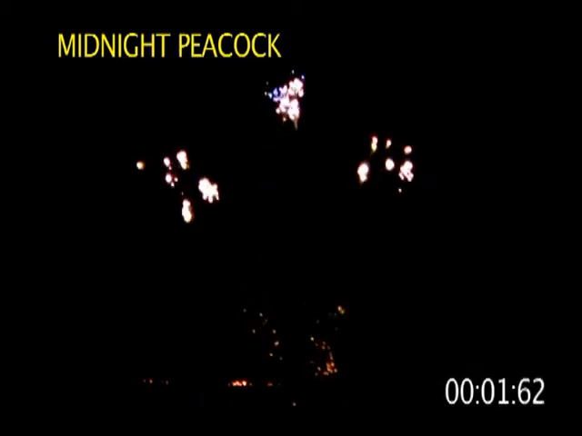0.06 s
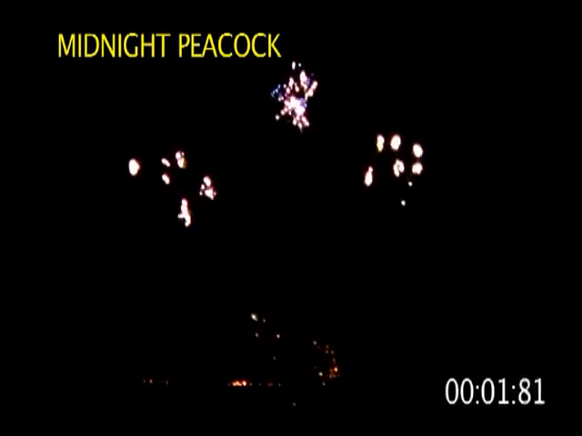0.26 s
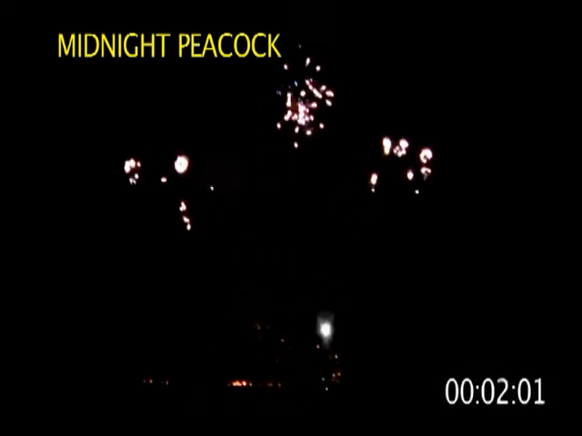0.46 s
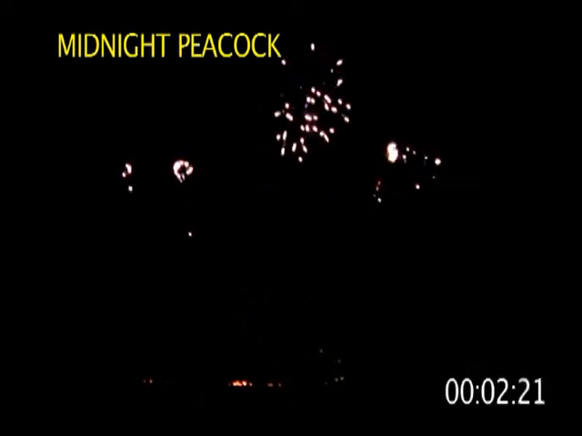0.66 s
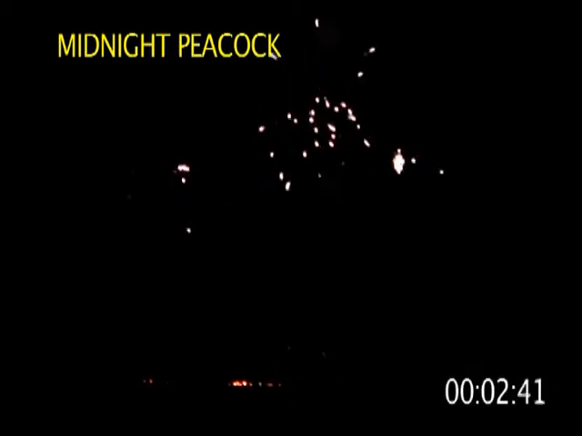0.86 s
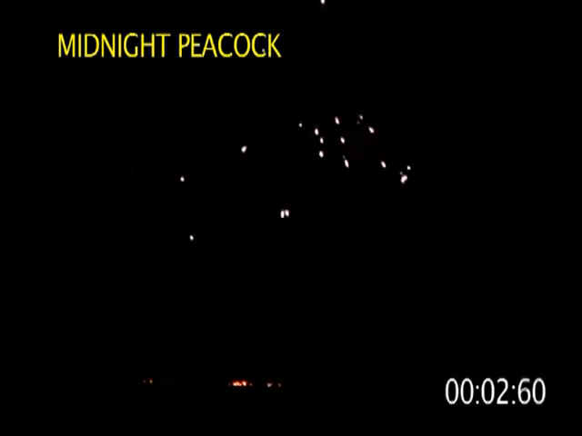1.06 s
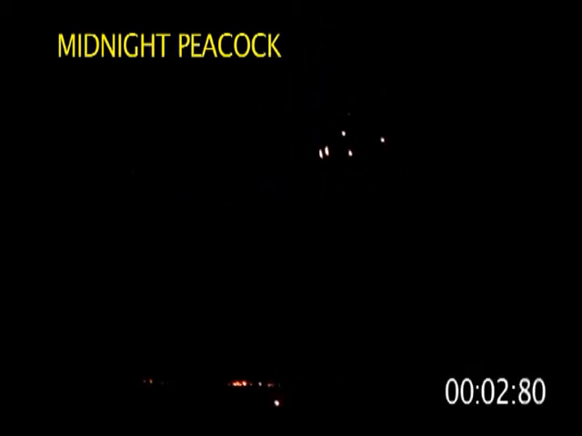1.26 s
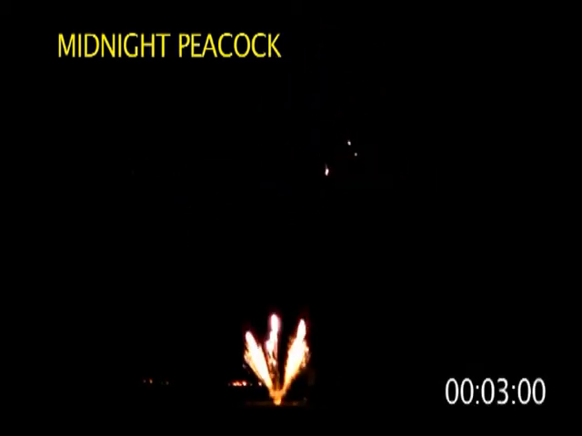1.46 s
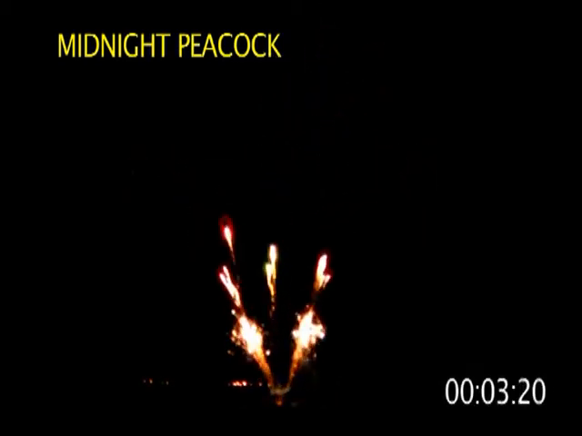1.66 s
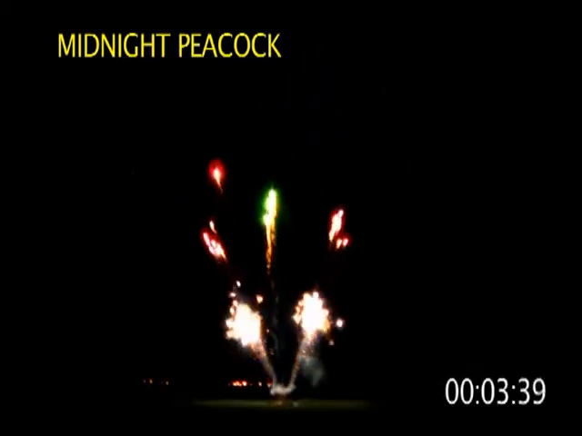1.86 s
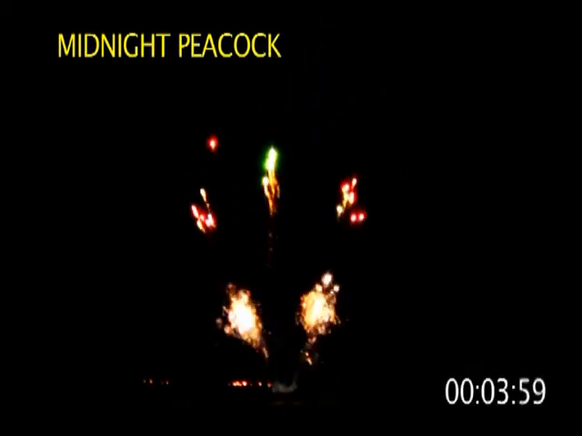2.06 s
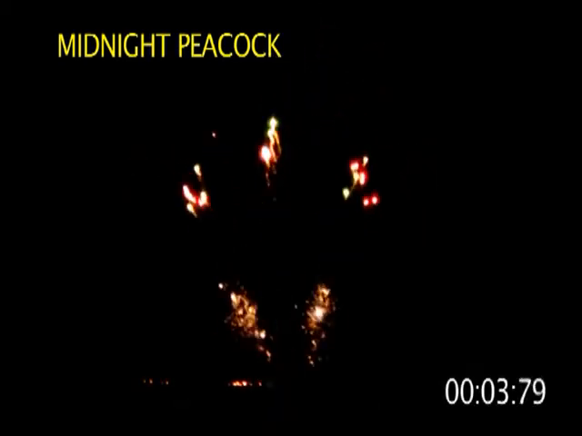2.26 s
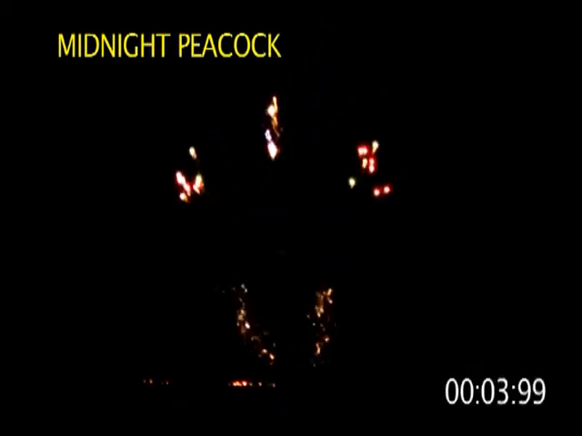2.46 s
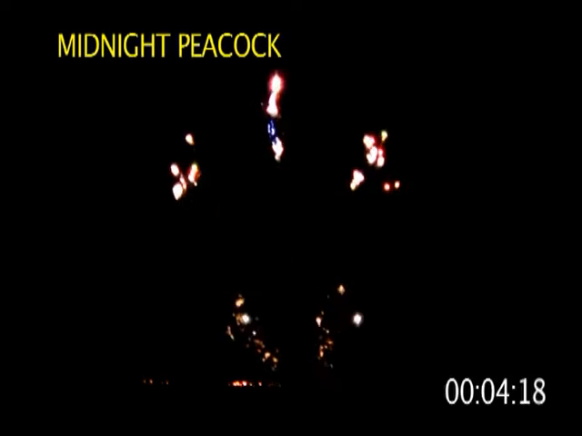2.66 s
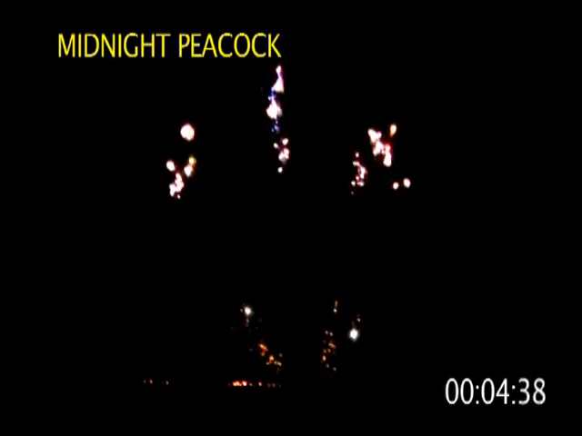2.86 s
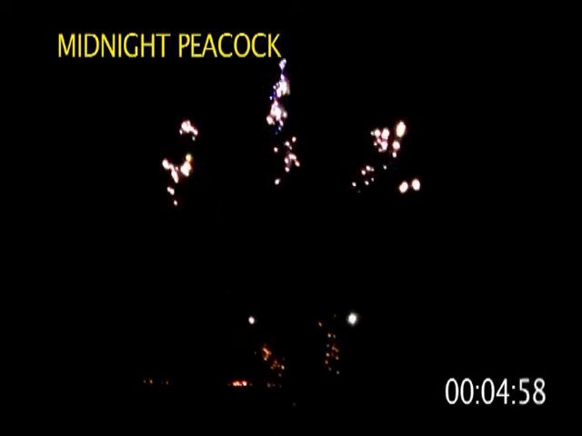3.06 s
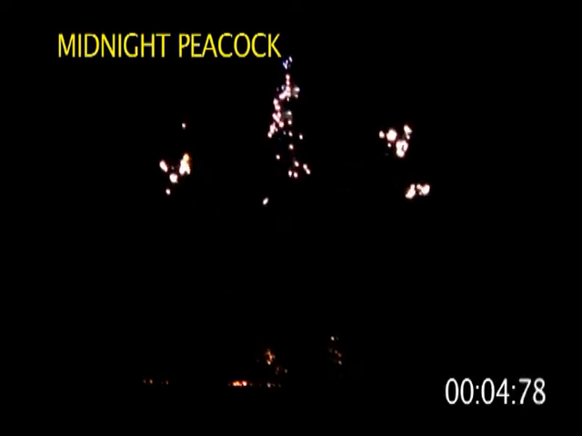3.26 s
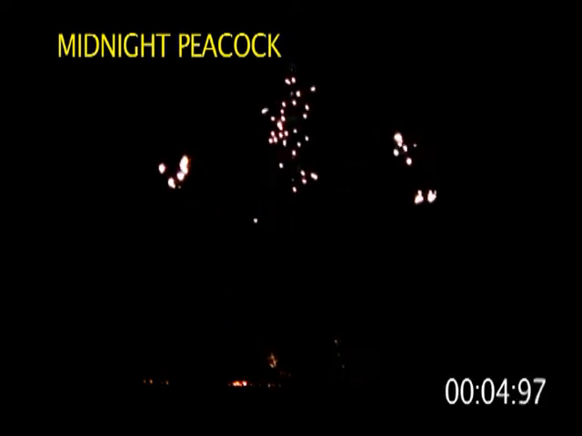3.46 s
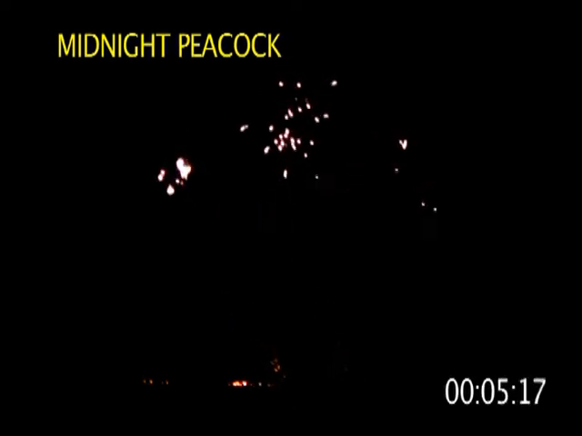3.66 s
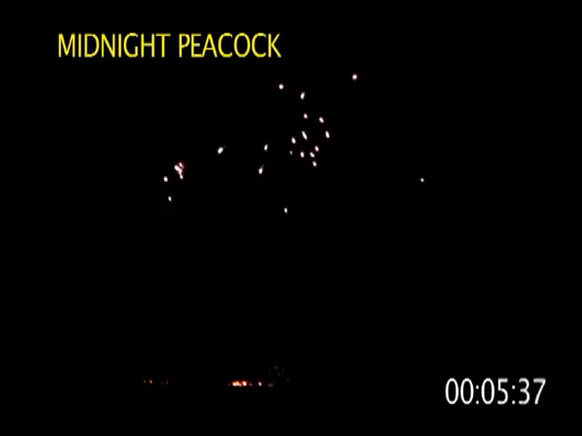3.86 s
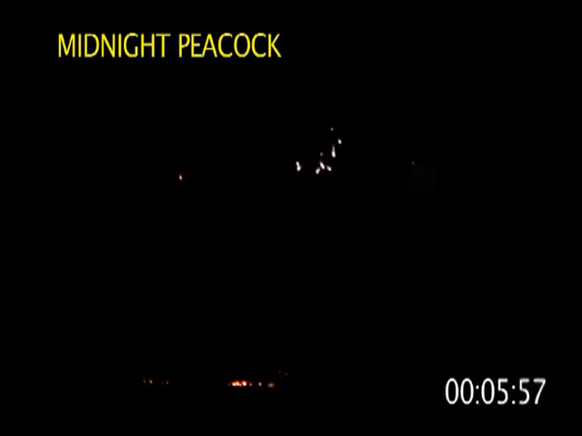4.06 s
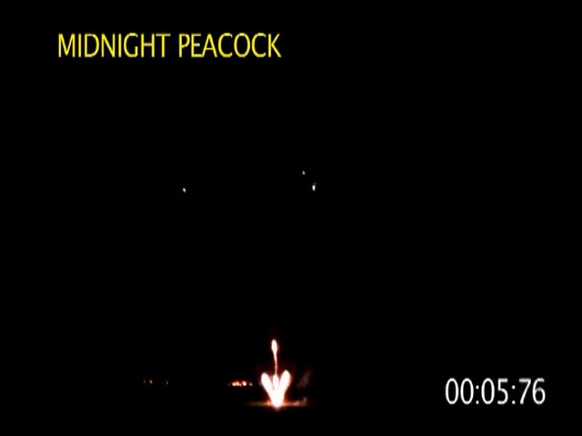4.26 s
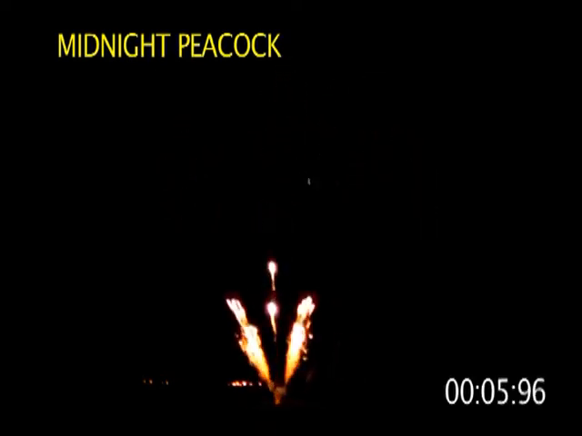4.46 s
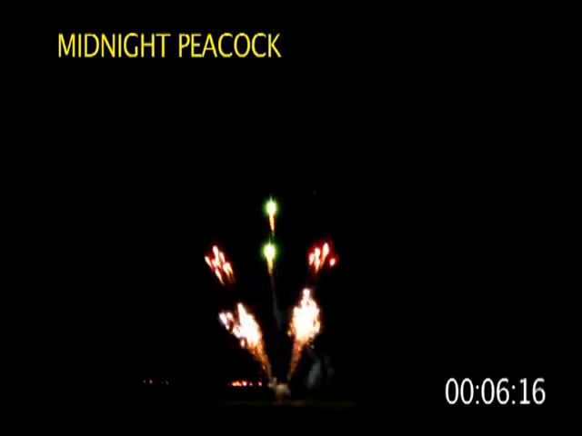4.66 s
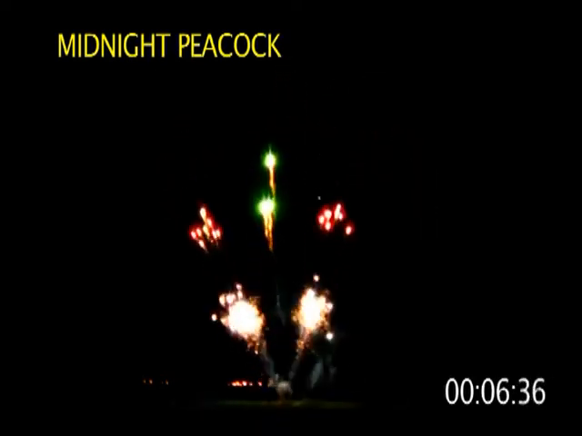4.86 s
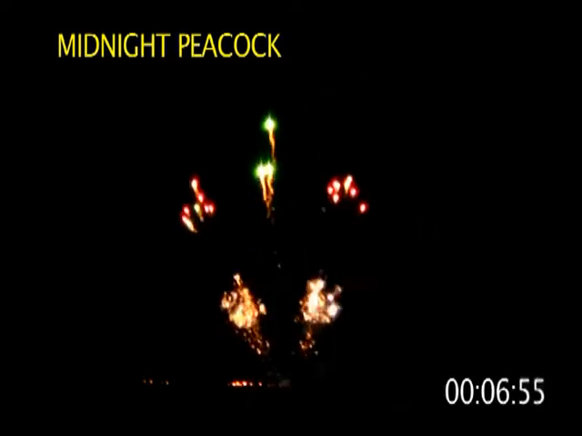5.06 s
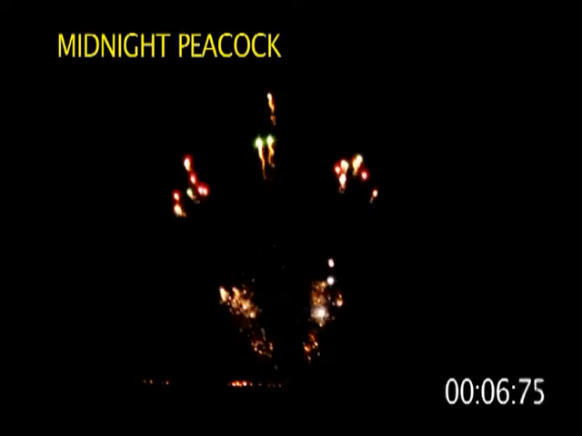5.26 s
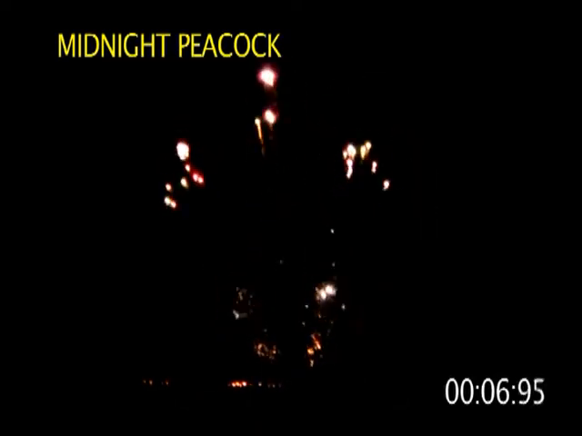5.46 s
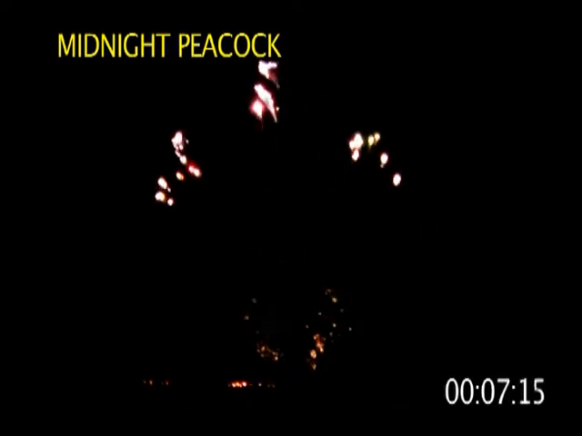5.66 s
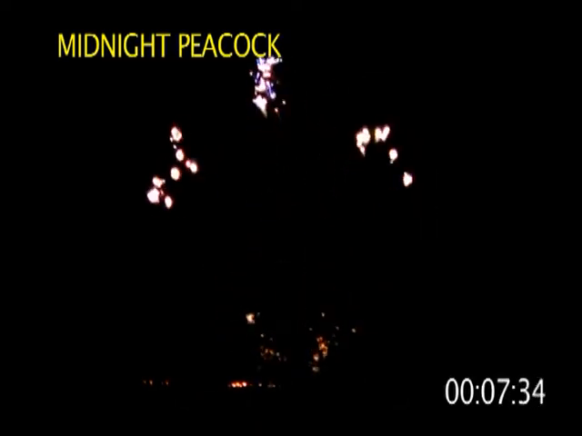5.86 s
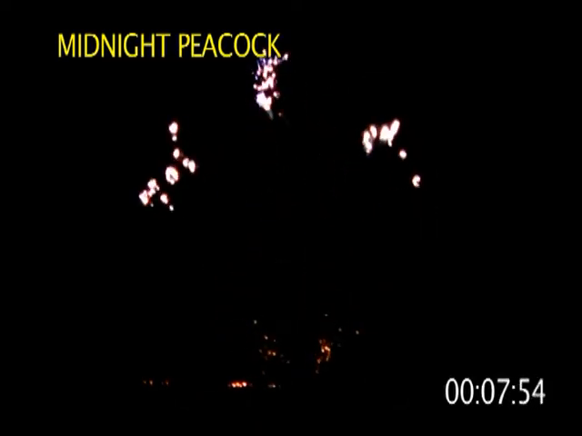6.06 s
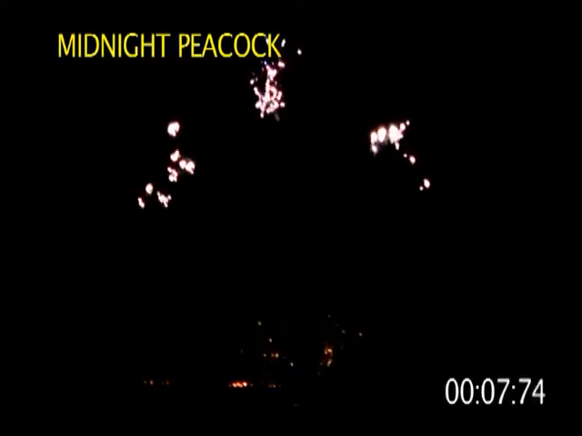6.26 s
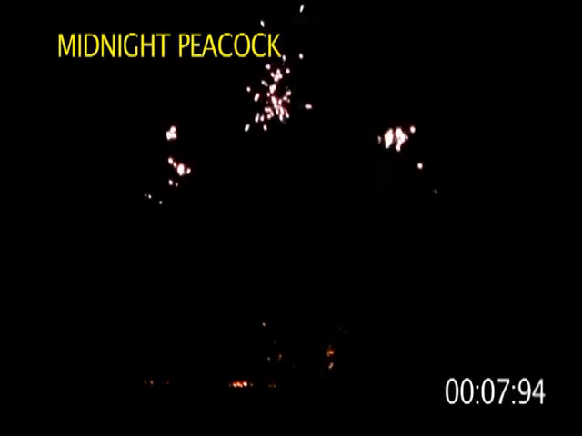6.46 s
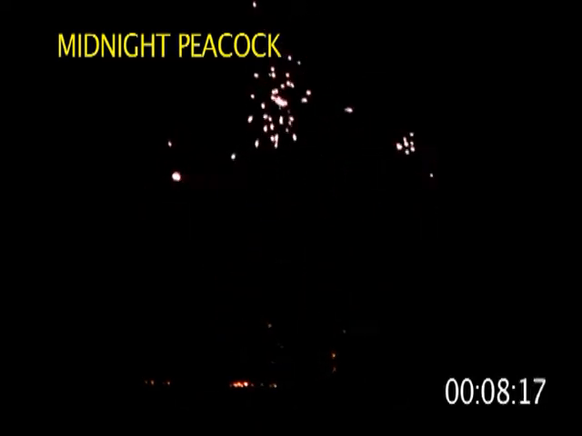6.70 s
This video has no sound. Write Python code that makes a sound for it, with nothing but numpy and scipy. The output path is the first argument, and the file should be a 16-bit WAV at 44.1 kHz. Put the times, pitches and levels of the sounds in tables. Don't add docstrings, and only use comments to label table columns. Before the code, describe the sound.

Two firework volleys thump hard from their tubes outdoors, each followed by a dense crackle that swells, then thins to scattered pops over rumbling wind.

```python
import sys
import numpy as np
from scipy import signal
from scipy.fft import rfft, irfft
from scipy.io import wavfile
from scipy.ndimage import uniform_filter1d

SR = 44100
rng = np.random.default_rng(int(sys.argv[2]) if len(sys.argv) > 2 else 0)


def level_to_linear(level):
    exponent = np.asarray(level, float) / 20
    return 10 ** exponent


def output_pcm(signal):
    pcm = np.clip(np.atleast_2d(signal).T, -1, 1) * 32767
    wavfile.write(sys.argv[1], SR, np.round(pcm).astype(np.int16))


N = 296793

# (time [s], peak level [dB], muzzle crack above thump [dB], pulse length [ms])
LIFT_CHARGES = [(1.5432, -6, -5.5, 1.12), (1.577, -7, -3.5, 1.22), (1.582, -8.5, 1, 0.82),
                (1.587, 3.5, -7.5, 2.1), (1.594, -17, 6, 3), (1.597, -6, -1.5, 1.33),
                (1.604, -18, -10, 2.3), (4.4146, -3.5, -0.5, 1.5), (4.467, -21, -8, 1),
                (4.475, -10, 3.5, 1.3), (4.480, -5.5, 8, 0.88), (4.484, -10, 10, 1.16),
                (4.4887, 3.5, -8, 2.14), (4.508, -13.5, -24, 1.4)]
# (frequency [Hz], level [dB], t60 [s])
TUBE_MODES = [
    (133, -2.5, 0.057),
    (195.5, -0.5, 0.035),
    (296, -14, 0.033),
]
# (time [s], swell level [dB], far echo level at swell end [dB], echo fading [dB/s])
VOLLEYS = [
    (-0.97, -31, -48, 14),
    (1.5986, -20, -48.5, 9),
    (4.5, -21, -50, 7),
]
# (time after volley [s], fizz level [dB], usual star peak level [dB])
SWELL = [
    (0.05, -34, -40),
    (0.13, -22, -31),
    (0.25, -13, -16),
    (0.38, -10, -12),
    (0.48, -4.5, -7.5),
    (0.6, -1.5, -11.5),
    (0.7, -6.5, -9.5),
    (0.879, -22, -17),
    (1.1, -30.5, -28.5),
]
# (time [s], peak level [dB], sharpness as treble over middle [dB])
LOUD_STARS = [(1.7616, -7.5, -26), (1.8127, -11, -3), (1.8508, -17, -3), (1.8561, -10, 0), (1.8892, -8, 5),
              (1.9058, -8, 6), (1.9526, -9, -1), (1.9986, -7.5, 8.5), (2.006, -2, 1), (2.0112, -7, 4),
              (2.0535, -7, 1), (2.1035, -2, 3), (2.119, -4.5, 2), (2.1345, -2, 8), (2.1698, 1, 2),
              (2.1862, -2, 5), (2.206, -4, 3), (2.2367, -1, 1), (2.2524, 0.5, -0.5), (2.2744, 1, -15),
              (2.2935, -4, -1), (2.3115, -3.5, 2), (2.3372, -3.5, -1), (2.3601, -6.5, 6), (2.3857, -4, 1),
              (2.4087, -3.5, 0), (2.4378, -9, 1), (2.449, -6.5, 3), (2.461, -6.5, 2), (2.4702, -4, -4),
              (4.634, -23, -5), (4.6735, -17, -12), (4.7049, -20, -20), (4.7492, -11, -4),
                (4.7714, -14.5, 2), (4.832, -10.5, -1), (4.842, -11, 0), (4.92, -12, 0), (4.9336, -6.5, -2),
                (4.943, -3.5, 1), (4.9551, -2, 6), (5.0058, -1.5, -2), (5.0221, -2.5, 5), (5.056, -2, 1),
                (5.0898, -4, -3), (5.106, -5, -22), (5.13, -3.5, -3), (5.153, -2, -10), (5.1776, -5, -21.5),
                (5.227, -8.5, -18), (5.247, -10, -14), (5.2637, -15, -16), (5.3096, -11, -12),
                (5.3378, -10, -9), (5.3527, -11.5, -19), (5.3537, -6.5, -2), (5.3756, -8, 0),
                (5.396, -12, -12), (5.4339, -12, -18), (5.4438, -17, -20)]
# (time [s], peak level [dB], sharpness [dB])
STRAGGLERS = [(0.2174, -19, 1), (0.232, -33, -15), (0.4722, -28.5, -8), (0.4739, -24.5, -2),
              (0.5825, -11.5, 1), (0.7497, -34.5, 2), (2.4987, -23.5, 3), (2.522, -20, -9),
              (2.5517, -16, -1), (2.579, -23, 8), (2.5811, -15.5, 1), (2.62, -21, -4),
              (2.64, -13, -2), (2.6482, -16, -8), (2.6696, -12, -5), (2.676, -14.5, -9),
              (2.7696, -25, -2), (2.8157, -29.5, -17), (2.9255, -27.5, -6), (2.9491, -14, -1),
              (2.9627, -30, 2), (3.0336, -27, -3), (3.0509, -19.5, 0.5), (3.148, -34.5, -1),
              (3.1973, -27.5, -21), (3.2483, -21, -1), (3.2495, -19, -21), (3.3304, -28, -10),
              (3.3494, -13, -4),
              (5.461, -19, 1), (5.465, -19, -2), (5.4841, -10.5, -12), (5.4854, -10.5, 1),
                     (5.5066, -15.5, -10), (5.5278, -15, -8), (5.5401, -22, 2), (5.5522, -25, -11),
                     (5.616, -26, -1), (5.676, -30, -15), (5.7093, -14, -15), (5.711, -19.5, 0),
                     (5.733, -27.2, -2), (5.756, -21, -8), (5.7749, -22, -8), (5.79, -18, -3),
                     (5.7918, -23, -7), (5.7965, -8, 1), (5.8049, -13.5, -6), (5.849, -19, 4),
                     (5.85, -12.5, -20), (5.905, -23.5, 2), (5.9067, -28, -1), (5.977, -22.2, 0),
                     (6.032, -19, -8), (6.0336, -14.5, -15), (6.1012, -22, 7), (6.3933, -16.5, 2),
                     (6.5562, -32, -11)]
# (frequency [Hz], width [Hz], level [dB])
HOUSING_MODES = [(490, 750, 2.5), (830, 350, 2), (1000, 120, -2.5), (1265, 49, 6.5), (1600, 110, -1),
                 (1810, 130, 4), (2250, 510, 7.5), (2997, 755, 7.5), (3885, 540, 4), (4480, 260, -10.5),
                 (4910, 405, 5.5), (6130, 1430, -6), (7410, 1170, -17), (8700, 1200, -2),
                 (13000, 1000, -3.5)]
# (time [s], rumble level [dB], held [s], left over right [dB])
GUSTS = [(0.3, -47.5, 0.15, -1), (0.548, -36, 0.21, -9.5), (1.05, -40, 0.14, -10), (1.18, -37, 0.026, -10),
         (1.344, -48, 0.035, 3), (1.62, -41, 0.23, 0), (1.95, -44.5, .3, -2), (2.3, -40, 0.19, -2.5),
         (2.65, -45, 0.2, -9.5), (3.04, -39.5, 0.16, -4.5), (3.33, -38.5, 0.0076, -9),
         (3.46, -45.5, 0.011, -11), (3.78, -64, 0.018, -1), (4.55, -48.5, .4, -1), (5.06, -33.5, 0.098, 1),
         (5.25, -45.5, .18, 3), (5.47, -37, 0.17, 4), (5.75, -46.5, 0.11, -3), (6.3, -44, 0.072, -8),
         (6.62, -49, 0.054, -1)]
# (frequency [Hz], level per Hz [dB])
GUST_SPECTRUM = [(8.8, -35), (15, -11), (43, 4.5), (102, -0.5), (184, -5), (280, -18), (356, -24),
                 (432, -26.5), (700, -33.5), (910, -49), (1540, -120)]
# (peak time [s], level [dB], rise [dB/s], fall [dB/s])
RUSHES = [
    (1.55, -54.5, 46, 30.5),
    (5.15, -30.5, 72, 61),
]
# (frequency [Hz], width [Hz])
RUSH_BANDS = [(1090, 480), (1275, 110)]
# (frequency [Hz], level per Hz [dB])
NIGHT_SPECTRUM = [(71, -20), (120, -2), (190, -18), (226, -5.5), (394, -11.5), (450, -12.5), (1170, -9.5),
                  (1290, -12), (1660, -17.5), (11700, -41.5), (15200, -65.5), (22000, -120)]


def volleys(crack_t60=0.049, rise_ms=1.5, roar_db=-24, roar_t60=0.34, mouth_hz=2250):
    push, shock, crack = np.zeros(N), np.zeros(N), np.zeros((2, N))
    tail = 6000
    rise = 1 - np.exp(-np.arange(tail) / (rise_ms * SR / 1000))
    for s, level_db, crack_db, pulse_ms in LIFT_CHARGES:
        at = round(s * SR)
        size = max(round(2 * pulse_ms * SR / 1000), 4)
        push[at:at + size] += level_to_linear(level_db) * np.hanning(size) / size
        shock[at + size // 4] += level_to_linear(level_db + crack_db)
        mid, side = rise * (dying(crack_t60, tail) + level_to_linear(roar_db) * dying(roar_t60, tail))
        crack[:, at:at + tail] += level_to_linear(level_db + crack_db - 11.5) * widened(mid, 0.38 * side)
    thump = 0
    for hz, level_db, t60 in TUBE_MODES:
        r, w = level_to_linear(-60 / (t60 * SR)), 2 * np.pi * hz / SR
        mode = signal.lfilter([1, -r * np.cos(w)], [1, -2 * r * np.cos(w), r * r], push + 1e-18)
        thump = thump + level_to_linear(level_db) * mode
    thump = butter(thump, 44, "high")
    crack = crack + 5.2 * resonance(shock, mouth_hz, width=760)
    return 1.53 * thump * level_to_linear([[.4], [-.4]]) + housing(crack)


def stars():
    loud = in_pieces(LOUD_STARS)
    rows = np.vstack([loud, STRAGGLERS, lesser_stars()])
    s, level_db, treble_db = rows.T
    unit = np.abs(housing(np.eye(2, 200))).max()
    sharp = np.clip(1.03 + treble_db / 18, 0, 1)
    return housing(bursts(s - .00015, level_db + 0.48, sharp)) / unit


def in_pieces(rows):
    split_ms, split_loss_db = 2.5, 3
    chance = rng.random((len(rows), 4))
    first = np.array(rows) - [0, split_loss_db, 0]
    pieces = [first]
    for k in range(2):
        delay = split_ms / 1000 * (k + chance[:, k])
        weaker_db = -9.0 * chance[:, 2 + k]
        pieces.append(first + np.transpose([delay, weaker_db, np.zeros(len(rows))]))
    return np.vstack(pieces)


def lesser_stars(count=90, under_db=-3.0, spread_db=3.0, sharp_db=-3.5):
    after, _, peak_db = np.transpose(SWELL)
    chance, size = rng.random((2 * count, 3)), rng.standard_normal(2 * count)
    late = 0.13 + 0.41 * (np.sqrt(chance[:, 0]) + chance[:, 2])
    s = np.repeat([VOLLEYS[1][0], VOLLEYS[2][0]], count) + late
    level_db = np.interp(late, after, peak_db) + under_db + spread_db * size
    return np.transpose([s, level_db, sharp_db + 24 * (chance[:, 1] - .5)])


def bursts(s, level_db, sharp, spread=.7, echo_ms=2.0, t60=0.022, apart=1.83, dull_hz=3000):
    chance = rng.standard_normal((len(s), 4))
    scatter_db, echo_db = -24, -11
    echo = level_to_linear(echo_db + 2 * chance[:, 2])
    gain = level_to_linear(level_db + np.outer([.5, -.5], 1.6 * chance[:, 3]))
    lag = spread * chance[:, 0]
    late = echo_ms / 1000 * np.exp(.45 * chance[:, 1])

    def with_echo(share):
        return place(s, gain * share, lag) + place(s + late, gain * share * echo, lag)

    clicks = butter(with_echo(sharp), 9500, "low") + 1.51 * butter(with_echo(1 - sharp), dull_hz, "low")
    energy = place(s + 0.00053, gain ** 2, lag) + 1e-18
    power = signal.lfilter([1], [1, -level_to_linear(-120 / (t60 * SR))], energy)
    mid, side = butter(rng.standard_normal((2, N)), 5800, "low", order=1)
    side = butter(side, 5600, "high", order=4) + .5 * butter(side, 1100, "low")
    return clicks + level_to_linear(scatter_db) * np.sqrt(power) * widened(mid, apart * side)


def sky(per_s=650, sizes_db=2.5, alike=0.95, far_hz=6000):
    level_db, share, hiss_db = swells()
    share = np.clip(share, 0, 1)
    s = np.flatnonzero(rng.random(N) < per_s * level_to_linear(3.2 * drift(60)[0]) / SR) / SR
    small = bursts(s, sizes_db * np.minimum(rng.exponential(1, len(s)), 3), rng.random(len(s)))
    mid, side = rng.standard_normal((2, N))
    side = butter(side, 5200, "high", order=4) + .5 * butter(side, 1000, "low")
    wash = butter(widened(alike * mid, 0.92 * side), far_hz, "low")
    hiss = butter(rng.standard_normal((2, N)) + 0.86 * mid[::-1], 8000, "high", order=8)
    hiss = one(hiss) * level_to_linear(3.8 * drift(150)[0])
    hiss = one(butter(hiss, 11000, "low", order=1))
    crackle = np.sqrt(share) * one(housing(small)) + np.sqrt(1 - share) * one(housing(wash))
    return level_to_linear(level_db + 1.5) * butter(crackle, 380, "high") + level_to_linear(hiss_db - 1) * hiss


def swells():
    swell_end_s, echo_thinning = 1.073, 3
    crackle_share, far_share, wash_at_peak = .88, .45, .12
    trail_db, trail_fade, trail_floor_db = -10.5, 11, -78
    t = np.arange(N) / SR
    fizz, near, hiss = 0, 0, level_to_linear(trail_floor_db) ** 2
    after, fizz_db, _ = np.transpose(SWELL)
    for s, swell_db, echo_db, fading in VOLLEYS:
        swell = level_to_linear(swell_db + np.interp(t - s, after, fizz_db, left=-99, right=-99)) ** 2
        thinning_db = echo_thinning * np.maximum(t - s - swell_end_s, 0) ** 2
        power = swell + level_to_linear(in_time(s + swell_end_s, echo_db, 30, 0, fading) - thinning_db) ** 2
        fizz = fizz + power
        near = near + swell
        hiss = hiss + power * level_to_linear(trail_db - trail_fade * np.clip(t - s, 0, 1.5)) ** 2
    share = far_share + (crackle_share - far_share) * near / fizz - wash_at_peak * fizz / fizz.max()
    return 10 * np.log10(fizz), share, 10 * np.log10(hiss)


def housing(x, low_hz=1500, high_hz=4800, skew=0.026):
    x = butter(butter(x + 1e-18, low_hz, "high", order=1), high_hz, "low")
    hz, width, level_db = np.transpose(HOUSING_MODES)
    out = []
    for port, turn in zip(x, (skew, -skew)):
        w, a = 2 * np.pi * hz * (1 + turn * (hz > 5500)) / SR, level_to_linear(level_db / 2)
        k = np.sin(w) * width / hz / 2
        c = -2 * np.cos(w)
        sections = np.array([1 + k * a, c, 1 - k * a, 1 + k / a, c, 1 - k / a]) / (1 + k / a)
        out.append(signal.sosfilt(sections.T.copy(), port))
    return np.array(out)


def roll():
    level_db, held_s, fall = -39, .1, 30
    low = butter(rng.standard_normal((2, N)), 60, "high", order=4)
    mid, side = one(butter(low, 235, "low", order=4))
    gain = sum(level_to_linear(in_time(s + 0.031, level_db, 900, held_s, fall)) for s, *_ in VOLLEYS)
    return gain * level_to_linear(1.5 * drift(16)[0]) * widened(mid, 0.45 * side)


def wind(lumpy_db=2.5, shared=.3, even_s=.06):
    rise, fall, lull_db = 339, 130, -55.5
    power = level_to_linear(lull_db) ** 2
    for s, level_db, held, pan in GUSTS:
        power = power + level_to_linear(in_time(s, level_db, rise, held, fall) + pan * np.array([[.5], [-.5]])) ** 2
    left, right = coloured(GUST_SPECTRUM)
    pair = np.array([left + shared * right, right + shared * left])
    pair = pair / np.sqrt(uniform_filter1d(pair ** 2, round(even_s * SR)) + 0.036)
    return np.sqrt(power) * level_to_linear(lumpy_db * drift(25)) * pair


def night():
    hum_hz, hum_width_hz, hum_db, hiss_db = 92, 5.5, -56.5, -54.5
    turns = np.cumsum(hum_hz + hum_width_hz * drift(5.4)[0] / 2) / SR
    hum = np.sqrt(2) * np.sin(2 * np.pi * turns) * level_to_linear(2.8 * drift(15.0)[0])
    rush = 0
    for (s, level_db, rise, fall), band in zip(RUSHES, RUSH_BANDS):
        air = one(resonance(rng.standard_normal(N), *band))
        rush = rush + level_to_linear(in_time(s, level_db, rise, 0, fall)) * air
    return level_to_linear(hiss_db - 2) * coloured(NIGHT_SPECTRUM) + level_to_linear(hum_db) * hum + rush


def one(x):
    return x / np.sqrt(np.mean(x ** 2, axis=-1, keepdims=True) + 1e-20)


def widened(mid, side):
    return mid + side * [[1], [-1]]


def in_time(s, level_db, rise, held, fall):
    t = np.arange(N) / SR - s
    return level_db - rise * np.maximum(-t, 0) - fall * np.maximum(t - held, 0)


def butter(x, hz, kind, order=2):
    return signal.sosfilt(signal.butter(order, min(hz, .45 * SR), kind, fs=SR, output="sos"), x)


def resonance(x, hz, width):
    r, w = np.exp(-np.pi * width / SR), 2 * np.pi * hz / SR
    pole = np.array([(1 - r * r) / 2, 0, (r * r - 1) / 2, 1, -2 * r * np.cos(w), r * r])
    return signal.sosfilt([pole, pole], x)


def coloured(spectrum):
    hz, level_db = np.transpose(spectrum)
    log_hz = np.log(np.arange(N // 2 + 1) * SR / N + 1)
    gain = level_to_linear(np.interp(log_hz, np.log(hz), level_db))
    return one(irfft(rfft(rng.standard_normal((2, N))) * gain, N))


def drift(rate):
    return one(butter(rng.standard_normal((2, N + SR)), rate, "low")[:, SR:])


def dying(t60, size):
    return rng.standard_normal((2, size)) * level_to_linear(-60 * np.arange(size) / (t60 * SR))


def place(s, gain, lag):
    out = np.zeros((2, N + 4))
    for side, turn in enumerate((.5, -.5)):
        at = np.clip(s * SR + turn * lag, 0, N)
        whole = at.astype(int)
        np.add.at(out[side], whole, gain[side] * (1 - at + whole))
        np.add.at(out[side], whole + 1, gain[side] * (at - whole))
    return out[:, :N]


def scene():
    return volleys() + stars() + sky() + roll() + wind() + night()


def roll_off(x):
    return signal.sosfilt(signal.butter(12, 14420, fs=SR, output="sos"), x)


def record(dry):
    clipped = np.clip(dry, -.94, .94)
    narrow, wide = [signal.sosfilt(signal.cheby2(12, 50, hz, fs=SR, output="sos"), clipped)
                    for hz in (12100, 13800)]
    treble = uniform_filter1d(butter(clipped.mean(axis=0), 6300, "high") ** 2, size=2048)
    gate = np.clip((10 * np.log10(treble + 1e-12) + 62) / 8, 0, 1)
    return roll_off(gate * wide + (1 - gate) * narrow)


dry = scene()
out = record(dry)
output_pcm(out)
```